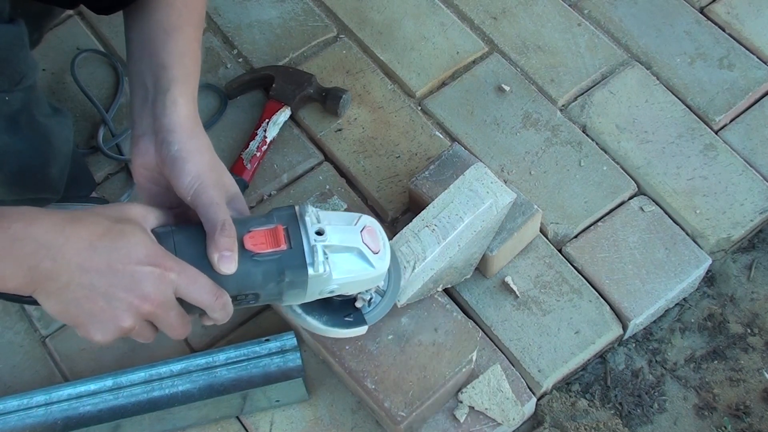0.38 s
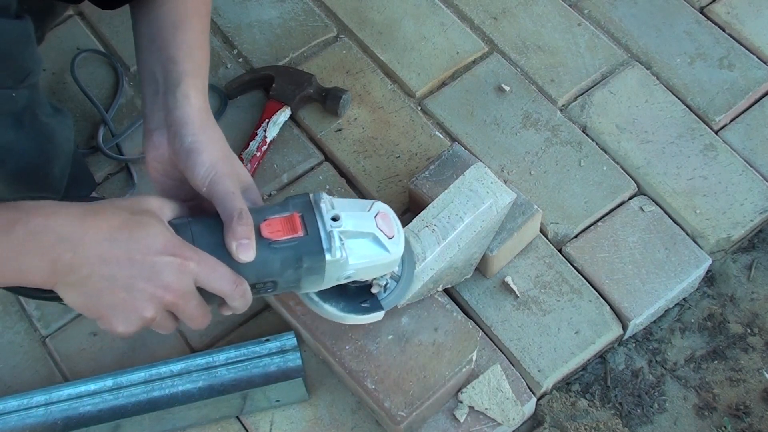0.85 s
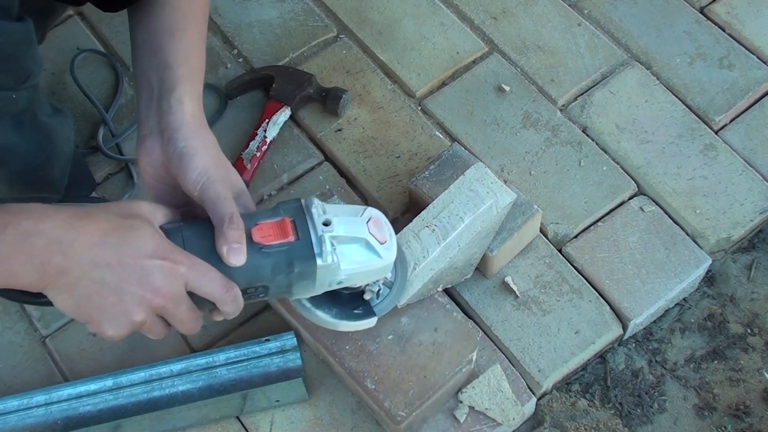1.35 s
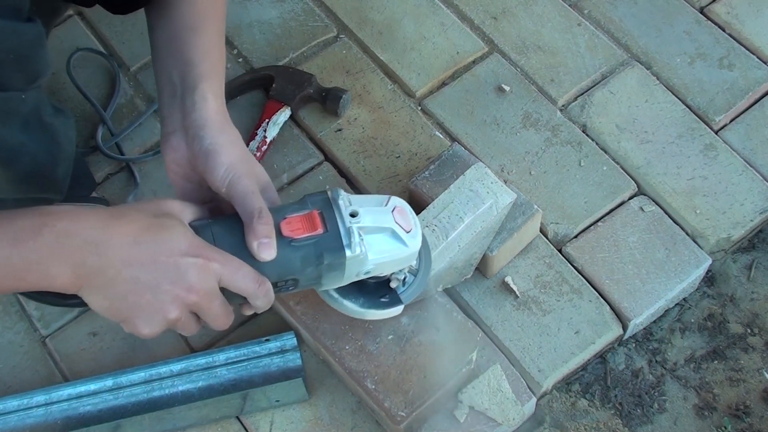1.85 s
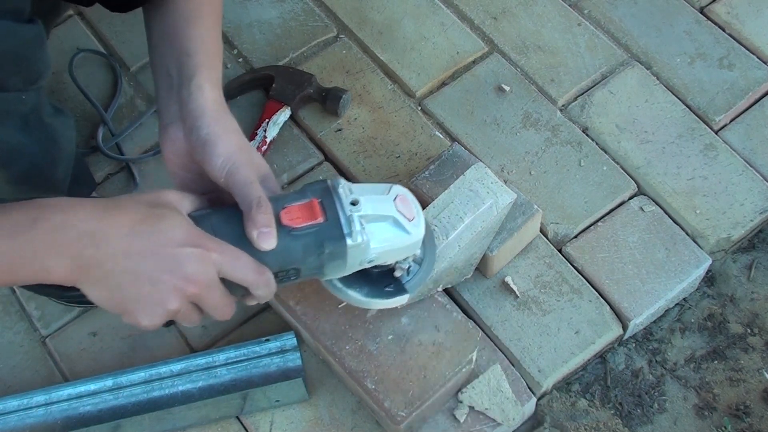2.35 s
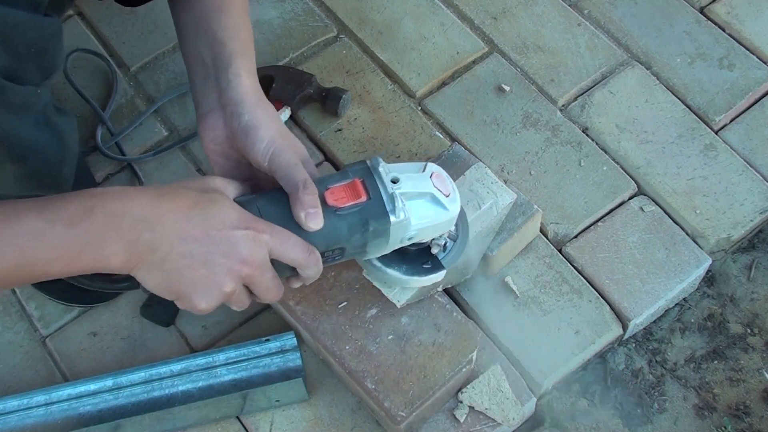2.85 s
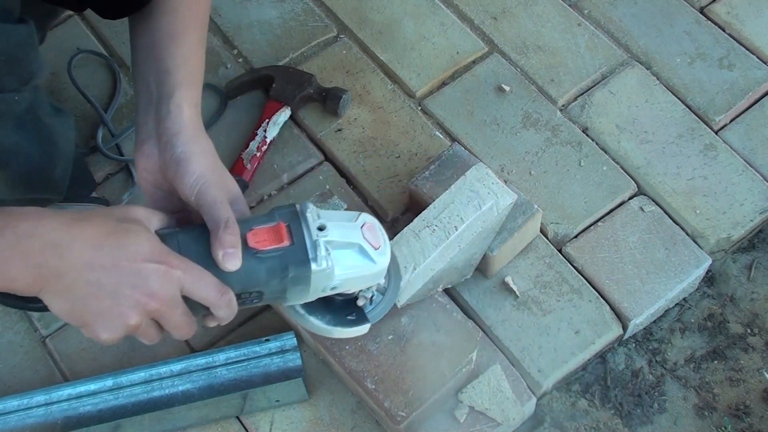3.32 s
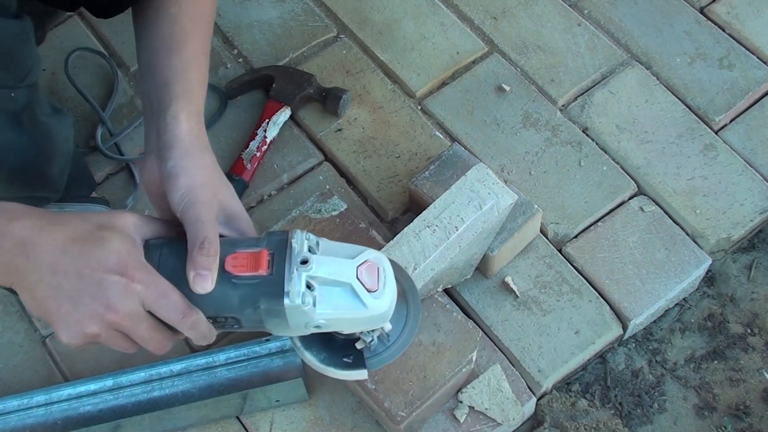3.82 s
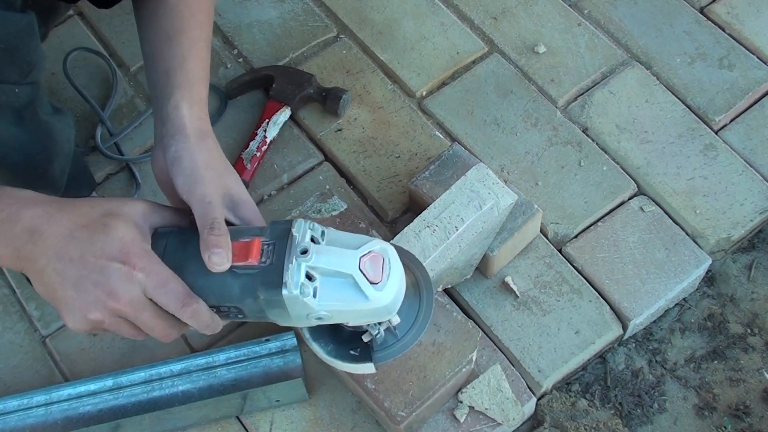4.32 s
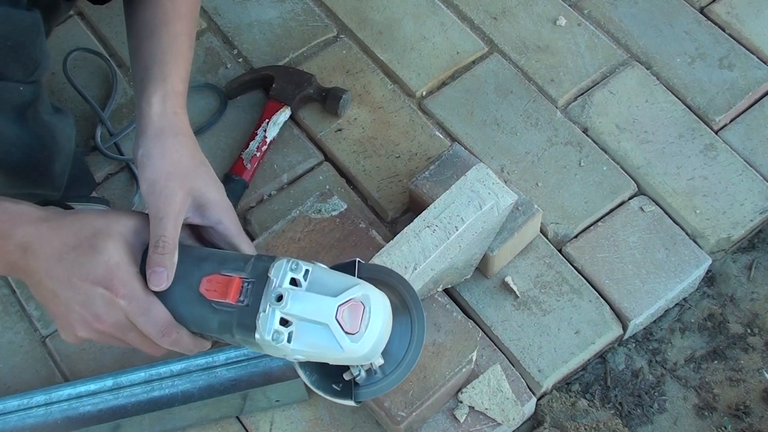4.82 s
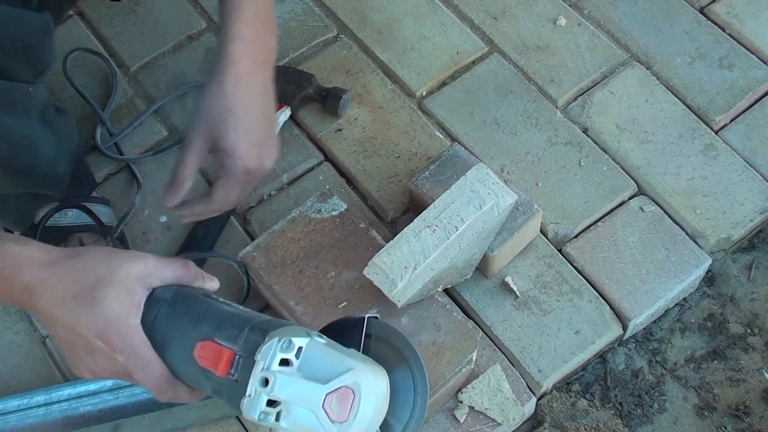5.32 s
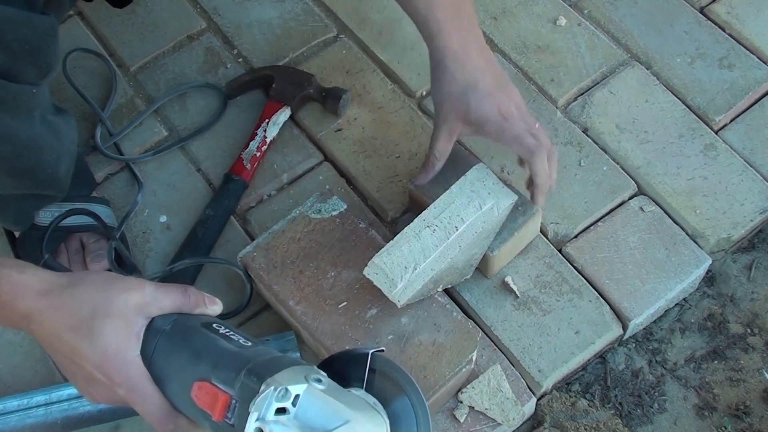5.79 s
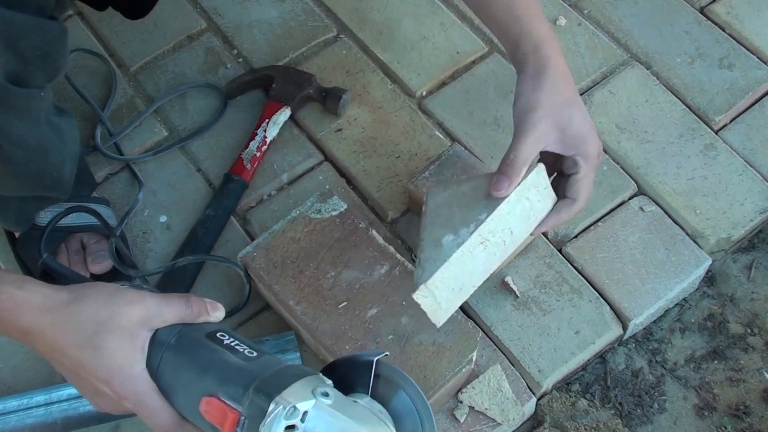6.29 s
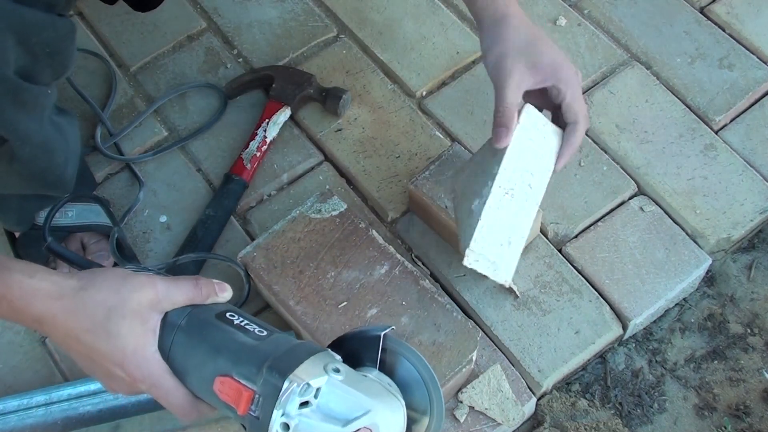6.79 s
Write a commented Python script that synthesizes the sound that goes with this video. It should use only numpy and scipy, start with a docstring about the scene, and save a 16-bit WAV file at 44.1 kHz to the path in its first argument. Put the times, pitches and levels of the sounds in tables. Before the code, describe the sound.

From the start an angle grinder is already at full speed, very close in an open paved yard: a piercing, slightly fluttering electric whine, broad hissing fan air and fine gear chatter. Quick touches on brick at about 0.2 and 0.6 s give short gritty chirps. Longer scrapes at 1.1-1.3 and 1.7-2.2 s make the steel disc sing with high squeals while the motor pitch dips and recovers. The longest cut, 2.7-3.4 s, drags the pitch lower and ends in a sharp screech. The tool then runs free, its whine climbing back, until it is switched off near 4.4 s. Pitch and rushing air glide down without stopping. From about 5.2 s slack gears knock, soon becoming a rapid, uneven, dry metallic rattle that continues to the end near 6.9 s. Very faint low distant hums lie beneath the last moments. Loudness stays compressed, with little bass.

```python
"""The steady whine and rushing air of an angle grinder at full speed on a paved yard, close by, gears chattering.
Its disc touches a clay brick five times: the motor sags and the steel disc sings and squeals.
Then the switch is released, the whine glides down and the slack gears clatter.
Motor tones follow one armature speed; air is shaped noise; disc and gears are resonances driven by noise,
apart from the squeals, which are wandering sines."""
import sys
import numpy as np
from scipy import signal
from scipy.fft import rfft, irfft, next_fast_len
from scipy.io import wavfile
from scipy.ndimage import uniform_filter1d, map_coordinates

SR = 44100
rng = np.random.default_rng(int(sys.argv[2]) if len(sys.argv) > 2 else 0)


def decibels_to_gain(level_db):
    """Convert a level in decibels to a linear amplitude gain (20 dB per decade)."""
    exponent = np.asarray(level_db, float) / 20
    return 10 ** exponent


def waveform_to_disk(signal):
    """Save audio, clipped to [-1, 1], as 16-bit WAV at the path in sys.argv[1]."""
    frames = np.transpose(np.atleast_2d(signal))
    scaled = np.clip(frames, -1, 1) * 32767
    samples = np.round(scaled).astype(np.int16)
    wavfile.write(sys.argv[1], SR, samples)


N = 304731
TIME_S = np.arange(N) / SR
FREE_HZ, OFF_S = 570.8, 4.377  # armature speed without load, time of switch-off

# disc on brick: start_s, end_s, drag_hz_per_s, rim_db
CUTS = [(0.183, 0.314, 20, -30), (0.591, 0.722, 15, -30), (1.09, 1.308, 35.3, -26),
        (1.733, 1.953, 22.3, -27), (1.949, 2.187, 70.3, -29.5), (2.73, 3.223, 40.3, -30.5),
        (3.223, 3.411, 91, -25.5)]
# face modes of the steel disc: mode_hz, width_hz, rel_db
FACE_MODES = [(2000, 90, -17), (3480, 57, -10), (4870, 45, -18), (5810, 36, -13), (6490, 45, -8),
              (7160, 45, -9), (8230, 68, -12), (8590, 60, -4), (9330, 72, -12)]
# gear head with loose teeth: mode_hz, width_hz, rel_db
HEAD_MODES = [(799, 67, -14), (1300, 60, -21), (2230, 420, -7.5), (2617, 174, -5.5), (3490, 120, 7.5),
              (3825, 180, 0.5), (4390, 87, 0), (6120, 430, -11), (7160, 213, -4), (8020, 220, -2.5),
              (9360, 127, -2), (10570, 110, -1.5), (11300, 900, -11.5)]


def unit(x):
    """Scaled to rms 1."""
    return x / np.sqrt(np.mean(x ** 2) + 1e-20)


def along(points, hz):
    """Interpolates (Hz, value) points on a log frequency axis."""
    point_hz, value = np.transpose(points)
    return np.interp(np.log(hz + 1), np.log(point_hz + 1), value)


def curves(rows):
    """One value per sample for each column after the time."""
    point_s, *columns = np.transpose(rows)
    return [np.interp(TIME_S, point_s, column) for column in columns]


def wobble(rate):
    """A smooth random curve, rate knots a second."""
    coarse = np.arange(0, N + 32, 32)
    knots = rng.standard_normal(int(N * rate / SR) + 4)
    return np.interp(np.arange(N), coarse, map_coordinates(knots, [coarse * rate / SR]))


def filtered(x, response):
    """x times a complex response of frequency."""
    size = next_fast_len(N + SR // 2)
    return irfft(rfft(x, size) * response(np.fft.rfftfreq(size, 1 / SR)), size)[..., :N]


def rings(modes):
    """Causal response of a set of resonances, of alternating sign."""
    def response(f):
        total = 0
        for k, (mode_hz, width_hz, db) in enumerate(modes):
            damping = 1j * f * width_hz
            total = total + (-1) ** k * decibels_to_gain(db) * damping / (mode_hz ** 2 - f ** 2 + damping)
        return total
    return response


def softened(modes):
    """Resonances struck by a contact that is too slow to drive the highest treble."""
    contact_hz = 11100
    return lambda f: rings(modes)(f) / (1 + 1j * f / contact_hz) ** 3


def gates(rows):
    """For each (start, end, ..) row a soft gate 0-1 and the progress 0-1 through it."""
    ramp_s = 0.035
    start, end = np.transpose(rows)[:2, :, None]
    gate = np.clip(np.minimum(TIME_S - start, end - TIME_S) / ramp_s + .5, 0, 1)
    return gate, np.clip((TIME_S - start) / (end - start), 0, 1)


def held(rows, rough_rad, rate, flutter_db):
    """(start s, end s, Hz, dB) sines; phase wanders with rate knots a second, level with half as many."""
    total = np.zeros(N)
    for (_, _, hz, db), gate in zip(rows, gates(rows)[0]):
        level = decibels_to_gain(db + flutter_db * wobble(rate / 2)) * np.sqrt(2)  # rms to peak
        total += gate * level * np.sin(2 * np.pi * hz * TIME_S + rough_rad * wobble(rate))
    return total


def armature():
    """Speed in Hz: the brick drags it down and the motor pulls it back; once switched off it coasts."""
    regain_s, coast_s, creep_hz = .28, 1.918, 43.9  # time constants, speed that the coasting heads for
    drag = np.transpose(CUTS)[2] @ gates(CUTS)[0]
    sag = signal.lfilter([1 / SR], [1, -np.exp(-1 / (SR * regain_s))], drag)
    coasting_s = np.maximum(TIME_S - OFF_S, 0)
    return creep_hz + (FREE_HZ - sag - creep_hz) * np.exp(-coasting_s / coast_s)


def motor():
    """Unbalance, slot, commutator and spindle tones locked to the armature; each flutters a little."""
    # how the housing radiates orders 1, 2, 12 and 24: tone_hz, rel_db
    unbalance = [(185, -55), (210, -57), (260, -48.5), (300, -39.5), (345, -28.5), (400, -40.5),
                 (480, -48.5), (570, -49)]
    second = [(380, -57), (430, -66), (700, -64), (780, -47), (900, -43), (1050, -45), (1140, -45)]
    slot = [(2200, -58), (2700, -38), (3300, -69), (3700, -36), (4420, -34), (4750, -38), (5200, -38),
            (5500, -25.5), (5900, -37), (6250, -21), (6850, -25.5)]
    bar = [(4400, -48), (5400, -36), (6000, -32.5), (7400, -30.5), (8250, -25), (8900, -32), (9300, -41),
           (9950, -42), (10900, -34.5), (11700, -33), (12400, -47), (13300, -37), (13700, -35.5)]
    # whine swells and fades as the tool is turned: time_s, order_12_gain_db, order_24_gain_db
    whine = [(0, 0.5, 8), (.6, 5, 8), (1.1, 7.5, 4), (1.8, 5, 8), (2.05, -11, 10), (2.3, 4.5, 4),
             (2.55, -1, 3), (2.72, 4.5, 7), (3.0, -3, 13.5), (3.2, 1, 8), (3.55, 4.5, 5), (3.9, 8, -1),
             (4.25, 8, 0), (4.45, 5.5, 5)]
    speed = armature()
    turn = 2 * np.pi * np.cumsum(speed) / SR
    slot_gain_db, bar_gain_db = curves(whine)
    spindle_db = -61 - 0.059 * (570 - speed)  # fades as the speed drops
    tones = [(1, along(unbalance, speed)),
             (2, along(second, 2 * speed)),
             (12, along(slot, 12 * speed) + slot_gain_db),
             (24, along(bar, 24 * speed) + bar_gain_db),
             (36, -42 - .07 * (430 - speed)),
             (.63, spindle_db),
             (1.62, spindle_db + 6)]
    total = np.zeros(N)
    for order, rel_db in tones:
        flutter_db = (1.74 + 1.2 * (order > 2)) * wobble(25) + 1.9 * wobble(5.5)
        phase = order * turn + 0.027 * order * wobble(80)
        audible = order * speed < SR / 2
        total += decibels_to_gain(rel_db + 2.5 + flutter_db) * np.sin(phase) * audible
    return total


def rush(spectrum, patchy_db):
    """Noise of rms 1 with patches of random gain in time and frequency."""
    z = signal.stft(rng.standard_normal(N), nperseg=512)[2]
    field = uniform_filter1d(uniform_filter1d(rng.standard_normal(z.shape), 6, 0), 8, 1)
    noise = signal.istft(z * decibels_to_gain(patchy_db * unit(field)), nperseg=512)[1][:N]
    return unit(filtered(noise, lambda hz: decibels_to_gain(along(spectrum, hz))))


def air():
    """The fan drives turbulent air through the vents, weaker as it slows."""
    # colours of the air: band_hz, density_db_per_hz (relative)
    body = [(30, -6.5), (117, -35), (300, -32.5), (490, -18.5), (1030, -13.5), (1400, -5.5), (2000, -5),
            (2360, -9), (2960, -0.5), (3600, -8), (4300, -3.5), (5000, -41)]
    hiss = [(2800, -36), (3600, -18.5), (5000, -11.5), (5800, -4.5), (6800, -2.5), (8000, -8),
            (10500, -10.5), (12200, -22), (16000, -27)]
    vent = [(6800, -37.5), (7400, 1), (8100, -2), (8500, -2), (9000, -16.5)]
    # band near 1.3 kHz: band_hz, density_db_per_hz (relative)
    low_band = [(950, -19), (1150, -11), (1350, -2), (1500, -25), (1750, -19.5)]
    # it comes forward once the tool is turned away from the brick: time_s, level_db
    low_band_level = [(0, -45), (3.6, -59), (4.2, -34), (5.2, -29.5), (5.7, -32.5), (6.91, -34.5)]
    gust_db = 0.76 * wobble(12)
    halvings = np.log2(FREE_HZ / armature())
    gate, progress = gates(CUTS)
    shade_db = 0.82 * np.sum(gate * progress, axis=0)  # the body band thins as a cut deepens
    total = decibels_to_gain(curves(low_band_level)[0]) * rush(low_band, patchy_db=2.0)
    # level at full speed (dB), loss per halving of speed (dB), colour, thinning (dB)
    bands = [(-23, 7.5, body, shade_db), (-16.5, 9, hiss, 0), (-22, 21.5, vent, 0)]
    for full_db, loss_db, colour, thinning_db in bands:
        level_db = full_db - loss_db * halvings + gust_db - thinning_db
        total += decibels_to_gain(level_db) * rush(colour, patchy_db=0.88)
    return total


def chatter():
    """Teeth tap at random across their play, in clumps that deepen when coasting, less often as the gears slow."""
    # rms of the two tooth flanks: time_s, loose_flank_db, loaded_flank_db
    flanks = [(0, -27.5, -29), (1.6, -26.5, -29), (2.4, -27.5, -26.5), (2.7, -20, -26), (2.94, -23, -11),
              (3.15, -21, -29), (3.5, -33, -30.5), (3.65, -20.5, -21), (4.0, -27.5, -33),
              (4.45, -27, -26.5), (4.7, -23, -23), (5.2, -19.5, -27), (5.7, -28, -47), (6.2, -26, -40),
              (6.91, -25, -38)]
    # gear head under load: mode_hz, width_hz, rel_db
    loaded_modes = [(3849, 68, 5), (4170, 55, -2.5), (10570, 80, -0.5)]
    speed = armature()
    rate = 4 * speed  # mean taps a second
    turn = 2 * np.pi * np.cumsum(speed) / SR
    # the play opens and closes about once in nine armature turns
    depth_db = np.where(TIME_S < OFF_S, 1, 3)
    play_db = depth_db * np.sin(.115 * turn + 1.64 * wobble(11))
    runout_db = 4.5 * np.sin(.315 * turn)  # the disc runs out of true once a spindle turn
    loose_db, loaded_db = curves(flanks)
    total = np.zeros(N)
    for level_db, beat_db, modes in ((loose_db, play_db, HEAD_MODES),
                                     (loaded_db, play_db + runout_db, loaded_modes)):
        taps = (rng.random(N) < rate / SR) * rng.standard_normal(N)
        taps = taps * np.sqrt(SR / rate) * decibels_to_gain(1.04 * wobble(35))
        total += decibels_to_gain(level_db) * unit(filtered(decibels_to_gain(beat_db) * taps, softened(modes)))
    return total


def singing(modes, level_db, waver_db, flutter_db=2.5):
    """Noise drives each mode to its own rms level, which wavers slowly and flutters fast."""
    total = np.zeros(N)
    for hz, width_hz, db in modes:
        mode_db = db + level_db + waver_db * wobble(6.31) + flutter_db * wobble(45)
        drive = decibels_to_gain(mode_db) * rng.standard_normal(N)
        to_unit_rms = np.sqrt(SR / (np.pi * width_hz))
        total += signal.lfilter(*signal.iirpeak(hz, hz / width_hz, SR), drive) * to_unit_rms
    return total


def cut():
    """Grit scrapes the disc; the face sings with the drag, the rim grows as the cut deepens."""
    # rim modes of the steel disc: mode_hz, width_hz, rel_db
    rim_modes = [(10340, 110, -12), (11290, 210, 0), (12010, 60, -9), (12700, 120, -10), (13490, 60, -3),
                 (14020, 50, -4), (14700, 90, -8), (15700, 45, -6)]
    gate, progress = gates(CUTS)
    drag, rim_db = np.transpose(CUTS)[2:, :, None]
    face_db = -21.5 + 0.52 * 20 * np.log10(drag / 20)  # -21.5 dB at a drag of 20 Hz/s
    deepening_db = 2.5 * (2 * progress - 1)
    total = np.zeros(N)
    for modes, stroke_db in ((FACE_MODES, face_db), (rim_modes, rim_db + deepening_db)):
        level_db = 20 * np.log10(np.sum(gate * decibels_to_gain(stroke_db), axis=0) + 1e-4)
        total += singing(modes, level_db, waver_db=0.5)
    return total


def squeals():
    """Now and then the grit locks on to the nearest mode of the disc face."""
    # one mode takes over: start_s, end_s, near_hz, level_db
    locked = [(.24, .31, 4870, -26), (.61, .67, 8590, -37), (.66, .71, 4870, -26), (.7, .75, 6490, -26),
              (1.099, 1.3, 8590, -23), (1.118, 1.302, 4870, -24), (1.195, 1.314, 6490, -18),
              (1.856, 2.0, 7160, -24), (1.908, 2.086, 3470, -25), (1.966, 2.17, 4870, -23.5),
              (1.976, 2.166, 5810, -25), (1.97, 2.188, 8590, -29), (2.066, 2.198, 6490, -22),
              (2.71, 2.998, 7160, -18.5), (3.218, 3.43, 8590, -26), (3.262, 3.385, 4870, -15.5),
              (3.324, 3.407, 6490, -14.5)]
    mode_hz = np.transpose(FACE_MODES)[0]
    rows = []
    for start, end, near_hz, db in locked:
        nearest = mode_hz[np.argmin(np.abs(mode_hz - near_hz))]
        rows.append((start, end, nearest, db))
    return held(rows, rough_rad=1.9, rate=70, flutter_db=4)


def knocks():
    """Once the drive is off, the wheel overruns the pinion and knocks back; weaker knocks fill the gaps."""
    # loud backlash knocks: time_s, peak_db, pinion_over_knock_db
    loud_knocks = [(5.2759, -13, -26), (5.4101, -8.5, -15.5), (5.4804, -3, -17), (5.5588, -4, -17),
                   (5.6326, -6, -15), (5.686, -5, -13), (5.7144, -10, -20), (5.7423, -5, -23),
                   (5.7728, -3.5, -20), (5.8057, -11, -11), (5.8287, -3, -25), (5.8556, -7.5, -7),
                   (5.8716, -6, -15), (5.9005, -11.5, -8), (5.9329, -6.5, -6.5), (5.9658, -2.5, -17),
                   (5.9998, -8, -9), (6.0621, -5.5, -15), (6.11, -9.5, -4.5), (6.1434, -7.5, -20),
                   (6.1669, -7, -11), (6.2068, -9, -8), (6.2402, -3, -13), (6.2926, -3.5, -13),
                   (6.3744, -7, -7), (6.4103, -7, -17), (6.4234, -5, -15), (6.4817, -9.5, -4.5),
                   (6.5131, -11, -14), (6.5276, -5, -16), (6.566, -4, -19), (6.5804, -4, -12),
                   (6.6248, -4.5, -20), (6.6568, -10, -13), (6.6762, -6, -20), (6.7072, -9.5, -16),
                   (6.7361, -5.5, -17), (6.777, -7, -29), (6.7974, -6, -18), (6.8144, -8, -21),
                   (6.8294, -7.5, -24), (6.8633, -4, -15.5), (6.8738, -11, -16), (6.8997, -7.5, -23)]
    # pinion ring: mode_hz, width_hz, rel_db
    pinion_modes = [(10510, 144, 0)]
    slack_s, gap_s, clear_s = 5.2, 0.024, 0.0091  # weaker knocks: from, mean gap, room left to a loud one
    bass_cut_hz = 1500
    luck = rng.standard_normal((110, 2))
    weak_s = slack_s + gap_s * (np.arange(len(luck)) + 0.23 * luck[:, 0])
    distance_s = np.min(np.abs(weak_s[:, None] - np.transpose(loud_knocks)[0]), axis=1)
    rows = list(loud_knocks)
    for s, r, apart_s in zip(weak_s, luck[:, 1], distance_s):
        if apart_s > clear_s and s < N / SR:
            rows.append((s, -11.5 + 2.0 * r, -20.5))
    # each knock is a short skid of noise, falling 60 dB in 22 ms
    t = np.arange(SR // 12) / SR
    skids = rng.standard_normal((len(rows), len(t))) * decibels_to_gain(-60 * t / 0.022) * np.minimum(t / 0.0004, 1)
    hz = np.fft.rfftfreq(len(t), 1 / SR)
    head_response = softened(HEAD_MODES)(hz) * (1j * hz / (bass_cut_hz + 1j * hz)) ** 2
    pinion_response = rings(pinion_modes)(hz) ** 2
    total = np.zeros(N + SR)
    for (s, peak_db, ring_db), skid in zip(rows, rfft(skids)):
        head = irfft(skid * head_response, len(t))
        ping = irfft(skid * pinion_response, len(t))
        knock = head / np.abs(head).max() + decibels_to_gain(ring_db) * ping / np.abs(ping).max()
        total[round(s * SR):][:len(t)] += decibels_to_gain(peak_db) * knock
    return total[:N]


def far_hum():
    """Faint low notes from afar, as slightly unsteady sines."""
    # start_s, end_s, pitch_hz, level_db
    notes = [(6.1, 6.3, 143, -56), (6.5, 7, 96, -54), (6.6, 7, 146, -58)]
    return held(notes, rough_rad=0.41, rate=20, flutter_db=0.5)


def scene():
    """Sums the sources; a random side signal, uneven by band and drifting, widens the stereo."""
    # side signal: band_hz, side_db (relative to the sum of the sources)
    side_level = [(150, -32), (330, -17), (700, -15.5), (1200, -14.5), (2000, -47), (2800, -11),
                  (4200, -49), (5500, -10), (8500, -37)]
    tool = motor() + air() + chatter() + cut() + squeals() + knocks() + far_hum()
    hz, _, z = signal.stft(tool, SR, nperseg=512)
    drift = uniform_filter1d(rng.standard_normal((2, *z.shape)), 12, 2)
    random_gain = (drift[0] + 1j * drift[1]) / np.sqrt(2 * np.mean(drift ** 2))
    side_gain = decibels_to_gain(along(side_level, hz))[:, None]
    side = signal.istft(z * random_gain * side_gain, SR, nperseg=512)[1][:N]
    return np.array([tool + side, tool - side])


def low_pass(x):
    """Removes everything above the highest recorded frequency."""
    return signal.sosfilt(signal.butter(12, 17130, fs=SR, output="sos"), x)


def record(dry):
    """Gain control holds the level, peaks are rounded off, bass and top are cut, channels differ in colour."""
    # channel balance: band_hz, right_over_left_db
    balance = [(300, 0), (700, -.8), (1300, 0), (2600, 1), (4400, 1), (6000, 2), (8500, 0)]
    hold_db, hold_s, hold_share = -14, 0.024, 0.97  # level held, averaging time, share of the excess removed
    bass_cut_hz, top_hz = 170, 15780
    power = np.abs(uniform_filter1d(np.mean(dry ** 2, axis=0), round(hold_s * SR)))
    excess_db = np.maximum(10 * np.log10(power + 1e-12) - hold_db, 0)
    steadied = dry * decibels_to_gain(-hold_share * excess_db)
    rounded = steadied / (1 + np.abs(steadied / .9) ** 4) ** (1 / 4)

    def channels(hz):
        passed = hz ** 2 / (hz ** 2 + bass_cut_hz ** 2) * (hz < top_hz)
        return decibels_to_gain(np.outer([-.5, .5], along(balance, hz))) * passed

    mix = filtered(rounded, channels)
    return low_pass(mix)


dry = scene()
out = record(dry)
waveform_to_disk(out)
```